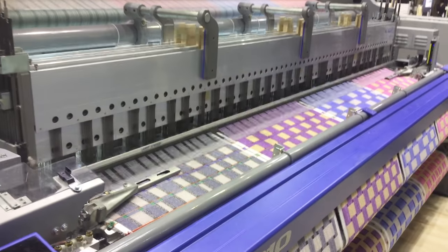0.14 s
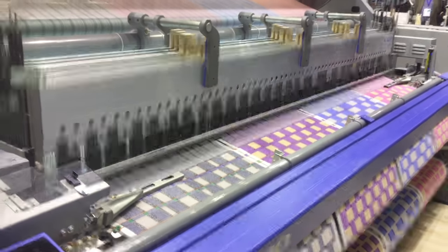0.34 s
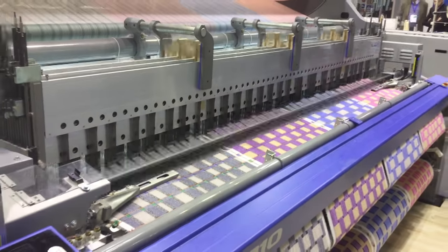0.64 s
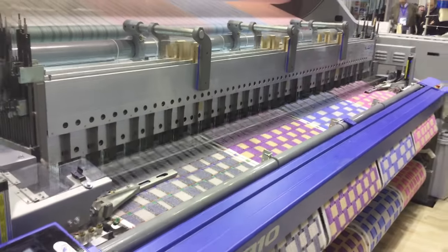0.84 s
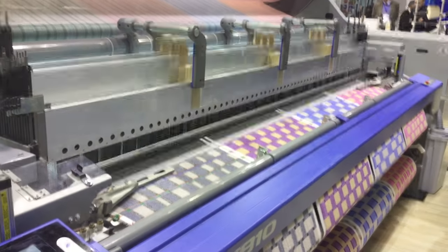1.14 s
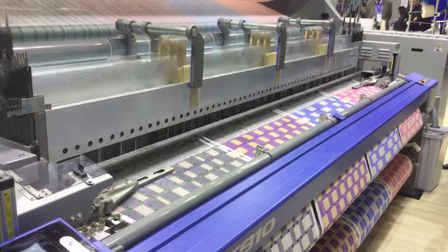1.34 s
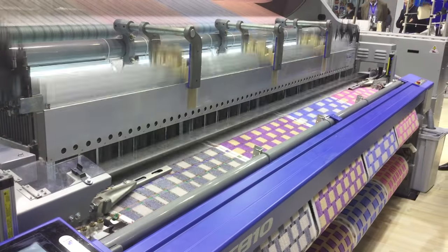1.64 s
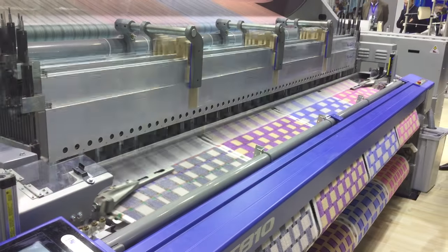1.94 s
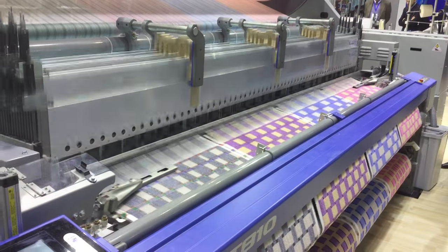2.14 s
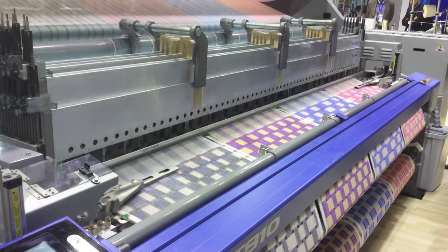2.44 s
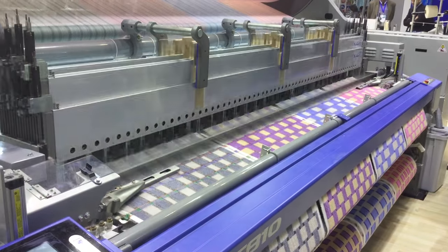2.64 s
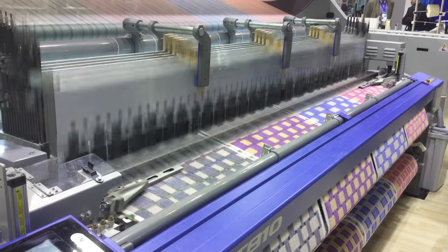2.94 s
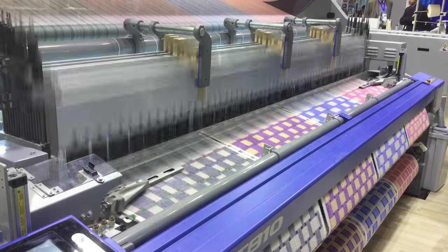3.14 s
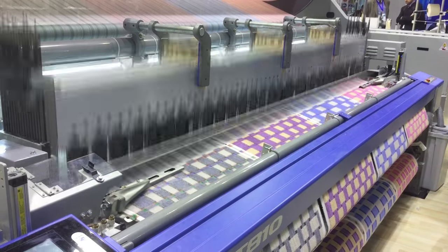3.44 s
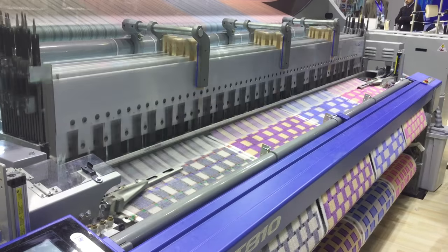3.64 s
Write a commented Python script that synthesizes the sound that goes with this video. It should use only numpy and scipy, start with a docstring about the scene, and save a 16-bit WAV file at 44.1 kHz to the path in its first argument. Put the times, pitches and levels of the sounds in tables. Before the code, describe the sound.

A fast air-jet loom fires hissing air bursts about eleven per second, each with a low buffeting thump and clatter; it skips a few beats, then runs faster, in a roaring hall, microphone close.

```python
"""A fast air-jet loom in a large factory hall, heard from beside its nozzle over a roar of other machines.
On every pick a valve opens and the jet hisses; its draught buffets the microphone and shoves it as it
arrives, and overloads it on the loudest gusts. The reed clatters in the middle of the pick, a low swirl
outlasts the draught, and the hall returns hiss and clatter. The loom skips a few picks, then runs faster:
draught, clatter and roar change in tone or level. All are shaped noise, but for the shove: a falling swing."""
import sys
import numpy as np
from scipy import signal
from scipy.io import wavfile
from scipy.ndimage import uniform_filter1d

SR = 44100
rng = np.random.default_rng(int(sys.argv[2]) if len(sys.argv) > 2 else 0)


def output_pcm(signal):
    """Save a mono or channel-first signal as 16-bit PCM at the path in sys.argv[1].

    Samples are clipped to [-1, 1] before scaling.
    """
    pcm = np.clip(np.atleast_2d(signal).T, -1, 1) * 32767
    wavfile.write(sys.argv[1], SR, np.round(pcm).astype(np.int16))


def undo_db(level):
    """Turn decibels back into plain size, where 20 dB means ten times bigger."""
    steps = np.asarray(level, float) / 20
    return 10 ** steps


N = 167580

# The loom's picks. Each row: valve opening in seconds, time open in seconds, then the levels of
# hiss, buffet and shove in dB, each before its trim.
PICKS = [(-0.0309, 0.06, -19, -7.5, -21), (0.0632, 0.055, -18, -10.5, -5), (0.1518, 0.053, -17, -10, -6),
         (0.242, 0.06, -18, -11.3, -11.9), (0.3349, 0.058, -18, -13.5, -12.2), (0.4274, 0.054, -17, -9, -3),
         (0.522, 0.05, -18, -11, -6), (0.6116, 0.056, -18.5, -11.5, -9.0), (0.701, 0.059, -16.5, -13, -3.5),
         (0.7945, 0.055, -18, -9, -7), (0.887, 0.053, -17.5, -12, -6), (0.977, 0.061, -18.0, -16, -5),
         (1.069, 0.061, -17.5, -12, -9), (1.1663, 0.058, -18.3, -17.5, -8.5), (1.43, 0.071, -17, -17, -13),
         (1.703, 0.074, -17.5, -15, -7.5), (1.8023, 0.047, -17.5, -7, 0.5), (1.8869, 0.051, -18, -11, -9),
         (1.9628, 0.046, -19, -11.5, -13), (2.0346, 0.049, -17.5, -9.5, -6),
         (2.1088, 0.057, -19.1, -9.5, -7), (2.1853, 0.051, -19, -9, -2.5), (2.258, 0.05, -20, -9, -2),
         (2.3332, 0.044, -17.5, -5.5, -1), (2.4067, 0.045, -18.5, -8.5, -3.5),
         (2.4807, 0.047, -18, -13, -6), (2.5572, 0.057, -18.7, -13, -3.9), (2.6316, 0.045, -18.5, -12, 0),
         (2.7059, 0.043, -18.5, -7.5, -8), (2.7815, 0.051, -18.5, -11, -2.5), (2.8547, 0.048, -19, -7, -4),
         (2.9282, 0.047, -19.2, -10, -3), (3.0038, 0.054, -20, -10, -1), (3.0791, 0.047, -19.5, -10, -2.5),
         (3.1502, 0.049, -20, -7.5, -9.3), (3.2273, 0.047, -18.6, -10.5, -2),
         (3.3032, 0.045, -18, -9, -6.1), (3.3776, 0.043, -18.8, -5.5, -5), (3.4515, 0.047, -20, -8.5, -1.5),
         (3.527, 0.042, -18.5, -10.5, -8.3), (3.5988, 0.043, -18.5, -9.5, -7.6),
         (3.6755, 0.046, -18.5, -8.5, -6), (3.7493, 0.044, -19.5, -6, -12)]
# Spectrum of the jet's hiss. Each row: frequency in Hz, relative density in dB per Hz.
HISS_SPECTRUM = [(300, -30), (700, -5), (1500, -2), (2600, 0.5), (4000, 0), (6500, -0.5), (8300, 0),
                 (9300, 1), (10300, -2), (12000, -3.5), (13500, -7.5), (15100, -8)]
# Spectrum of the draught's turbulence. Each row: frequency in Hz, relative density in dB per Hz.
BUFFET_SPECTRUM = [(25, -17), (50, -16), (100, 1), (200, 0.5), (350, -1), (500, -10), (1000, -15.5),
                   (2000, -22), (4000, -34)]
# Spectrum of the other machines. Each row: frequency in Hz, relative density in dB per Hz.
ROAR_SPECTRUM = [(30, -25), (55, -9.5), (95, -1), (170, -4.5), (300, -11.5), (480, -14.5), (800, -17),
                 (1700, -18), (2300, -24), (4200, -26), (7000, -32), (11000, -36.5), (15100, -48)]
# Recolouring of the buffet at the faster pace. Each row: frequency in Hz, change in dB per Hz.
BUFFET_FASTER = [(50, 3), (150, -1.5), (320, -2.5), (700, -1), (1500, 1.5)]
# Recolouring of the background roar at the faster pace: slightly less low, more hiss on top.
# Each row: frequency in Hz, change in dB per Hz.
ROAR_FASTER = [(100, -0.5), (350, -1.5), (600, 1.5), (1200, 3), (3000, 4), (7000, 7.5), (14000, 12)]

RUN_IN = 8820   # samples ahead of the scene, in which filters and hall settle
FASTER_FROM_S = 1.79
JET_LEAD_S, JET_RISE_S, JET_SHUT_S, HISS_TRIM_DB = 0.0018, 0.025, 0.018, 3
BUFFET_LAG_S, BUFFET_RISE_S, BUFFET_SHUT_S, BUFFET_TRIM_DB = 0.0023, 0.0082, 0.0076, 0.5
EDDY_HZ, EDDY_DB = 63, 2.5   # rate and spread of the lumps, before the strength is evened out
WAKE_DB, WAKE_S, WAKE_HZ = -8.0, 0.04, 82   # level against the buffet, decay time, upper edge
SHOVE_LAG_S, SHOVE_RISE_S, SHOVE_FADE_S, SHOVE_TRIM_DB = 0.0038, 0.002, 0.013, 3.5
SHOVE_END_HZ, SHOVE_SWEEP_HZ, SHOVE_SWEEP_S = 36, 128, 0.0075   # final pitch, excess at the start, its decay
BEAT_AT, BEAT_SPREAD_S, KNOCKS_PER_S = 0.44, 0.011, 2500   # place as a share of the time open
BEAT_DB, BEAT_FASTER_DB, BEAT_HALL_DB = -16.5, 2.5, 3.0   # direct level, gain when faster, extra hall return
BEAT_LOW_HZ, BEAT_HIGH_HZ, BEAT_CYCLES = 520, 2360, 4.5   # each resonance falls 60 dB in these cycles
HALL_DB, HALL_T60_S = -7, 0.34
ROAR_DB, ROAR_FLICKER_DB = -17, 0.74
MIC_LOW_HZ, TOP_HZ = 40, 15750
CLIP_TOP, CLIP_HARDNESS = 0.96, 5.2   # ceiling in full scale, sharpness of the knee


def rms_one(x):
    """Normalisation: division by the root of the mean power."""
    return x / np.sqrt(np.mean(x ** 2) + 1e-20)


def clock():
    """Time axis in seconds, negative during the run-in."""
    return (np.arange(N + RUN_IN) - RUN_IN) / SR


def drift(rate_hz):
    """Low-passed randomness: two equal poles turn white noise into a slow wander of unit spread."""
    r = np.exp(-2 * np.pi * rate_hz / SR)
    white = rng.standard_normal(N + 2 * RUN_IN)
    return rms_one(signal.lfilter([1], [1, -2 * r, r * r], white)[RUN_IN:])


def at_frequency(rows, hz):
    """Spectral interpolation: level in dB, linear along log frequency."""
    table_hz, table_db = np.transpose(rows)
    return np.interp(np.log(hz), np.log(table_hz), table_db)


def band_pass(x, low_hz, high_hz, order):
    """Band limitation: a Butterworth filter passes only one range of frequencies."""
    return signal.sosfilt(signal.butter(order, [low_hz, high_hz], "band", fs=SR, output="sos"), x)


def high_pass(x, order):
    """Low-frequency roll-off of the microphone, by a Butterworth filter."""
    return signal.sosfilt(signal.butter(order, MIC_LOW_HZ, "high", fs=SR, output="sos"), x)


def banded_noise(spectrum, flicker_db, shared_db, change=((1, 0), (2, 0))):
    """Subtractive synthesis: nearly half-octave noise bands, flickering, recoloured when faster; rms 1."""
    edges = np.geomspace(22, 16500, 21)
    faster = clock() > FASTER_FROM_S
    white = rng.standard_normal((2, N + RUN_IN))
    flickers = [drift(21), drift(37), drift(5.4)]   # dealt to the bands in turn
    out = 0
    for k, (low, high) in enumerate(zip(edges, edges[1:])):
        band = band_pass(white[k % 2], low, high, 2)
        mid = np.sqrt(low * high)
        level_db = at_frequency(spectrum, mid) + at_frequency(change, mid) * faster
        out = out + band * undo_db(level_db + flicker_db * flickers[k % 3])
    return rms_one(out * undo_db(shared_db))


def flow(column, lag, rise, shut):
    """Valve-gated flow: each pick opens, holds and shuts smoothly, scaled by one level column."""
    t, out = clock(), 0
    for row in PICKS:
        since = t - row[0] - lag
        opening = np.clip(since / rise + 0.5, 0, 1)
        closing = np.clip((row[1] - lag - since) / shut + 0.5, 0, 1)
        out = out + undo_db(row[column]) * np.sin(opening * closing * np.pi / 2) ** 2
    return out


def jet():
    """Jet noise: broadband hiss gated by the valve, with its diffuse return from the hall."""
    level = undo_db(HISS_TRIM_DB) * flow(column=2, lag=-JET_LEAD_S, rise=JET_RISE_S, shut=JET_SHUT_S)
    direct = level * banded_noise(HISS_SPECTRUM, 0, 0.81 * drift(35))
    # a diffuse return is independent noise under the hall's decaying level
    returned = hall(level) * banded_noise(HISS_SPECTRUM, 1.0, 0)
    return direct + returned


def buffet():
    """Turbulent pressure on the microphone: lumpy low noise in each draught, and a lingering swirl."""
    lumps = banded_noise(BUFFET_SPECTRUM, 1.0, EDDY_DB * drift(EDDY_HZ), BUFFET_FASTER)
    # each draught carries a steady strength
    lumps = lumps / np.sqrt(uniform_filter1d(lumps ** 2, size=2600))
    level = undo_db(BUFFET_TRIM_DB) * flow(column=3, lag=BUFFET_LAG_S, rise=BUFFET_RISE_S, shut=BUFFET_SHUT_S)
    swirl = rms_one(band_pass(rng.standard_normal(N + RUN_IN), WAKE_HZ / np.sqrt(3), WAKE_HZ, 4))
    r = np.exp(-1 / (WAKE_S * SR))
    wake_level = undo_db(WAKE_DB) * signal.lfilter([1 - r], [1, -r], level)
    return level * lumps + wake_level * swirl


def shove():
    """Transient pressure of an arriving draught: a suck, then a few swings that slow and die."""
    t = np.arange(4410) / SR
    turns = SHOVE_END_HZ * t + SHOVE_SWEEP_HZ * SHOVE_SWEEP_S * (1 - np.exp(-t / SHOVE_SWEEP_S))
    envelope = (1 - np.exp(-t / SHOVE_RISE_S)) * np.exp(-t / SHOVE_FADE_S)
    swing = -np.sin(2 * np.pi * turns) * envelope
    arrivals = np.zeros(N + RUN_IN)
    for row in PICKS:
        arrivals[int((row[0] + SHOVE_LAG_S) * SR) + RUN_IN] = undo_db(row[4] + SHOVE_TRIM_DB)
    return signal.fftconvolve(arrivals, swing)[:N + RUN_IN]


def beat_up():
    """Impact excitation: the reed beats up the weft, as dense knocks into short resonances."""
    t, n = clock(), N + RUN_IN
    swell = 0
    for start, length, *_ in PICKS:
        swell = swell + np.exp(-0.5 * ((t - start - BEAT_AT * length) / BEAT_SPREAD_S) ** 2)
    strength = undo_db(5.8 * np.minimum(rng.exponential(1, n), 4))
    sign = rng.choice([-1, 1], n)
    knocks = strength * sign * (rng.random(n) < KNOCKS_PER_S / SR)
    dealt, clatter = rng.integers(0, 12, n), 0   # every knock strikes one of twelve resonances
    for k, hz in enumerate(np.geomspace(BEAT_LOW_HZ, BEAT_HIGH_HZ, num=12)):
        r, w = undo_db(-60 * hz / (BEAT_CYCLES * SR)), 2 * np.pi * hz / SR
        struck = knocks * (dealt == k) + 1e-18
        clatter = clatter + signal.lfilter([0, np.sin(w)], [1, -2 * r * np.cos(w), r * r], struck)
    level = undo_db(BEAT_DB + BEAT_FASTER_DB * (t > FASTER_FROM_S)) * swell
    # direct and returned sound add in power
    return np.hypot(level, undo_db(BEAT_HALL_DB) * hall(level)) * rms_one(clatter)


def hall(level):
    """Diffuse reverberation: the source's power feeds a store that decays exponentially."""
    r = undo_db(-120 / (HALL_T60_S * SR))   # per-sample factor of power: 60 dB down after the decay time
    return undo_db(HALL_DB) * np.sqrt(signal.lfilter([1 - r], [1, -r], level ** 2))


def roar():
    """Sum of many incoherent machines: a continuous noise, slowly wavering, recoloured when faster."""
    return undo_db(ROAR_DB) * banded_noise(ROAR_SPECTRUM, ROAR_FLICKER_DB, 1.45 * drift(2.5), ROAR_FASTER)


def scene():
    """Superposition at the microphone, whose low cut is gentler for the shove than for the noises."""
    background = roar()
    noises = jet() + beat_up() + buffet() + background
    mixed = high_pass(noises, 4) + high_pass(shove(), 2)
    return mixed[None, RUN_IN:]


def top_cut(x):
    """Nothing passes above the cut-off."""
    return signal.sosfilt(signal.butter(12, 15220, fs=SR, output="sos"), x)


def record(dry):
    """Saturation: the input overloads smoothly on the loudest gusts; a steep low-pass cuts the top."""
    overloaded = dry / (1 + np.abs(dry / CLIP_TOP) ** CLIP_HARDNESS) ** (1 / CLIP_HARDNESS)
    finished = signal.sosfilt(signal.cheby2(20, 50, TOP_HZ, fs=SR, output="sos"), overloaded)
    return top_cut(finished)


dry = scene()
out = record(dry)
output_pcm(out)
```